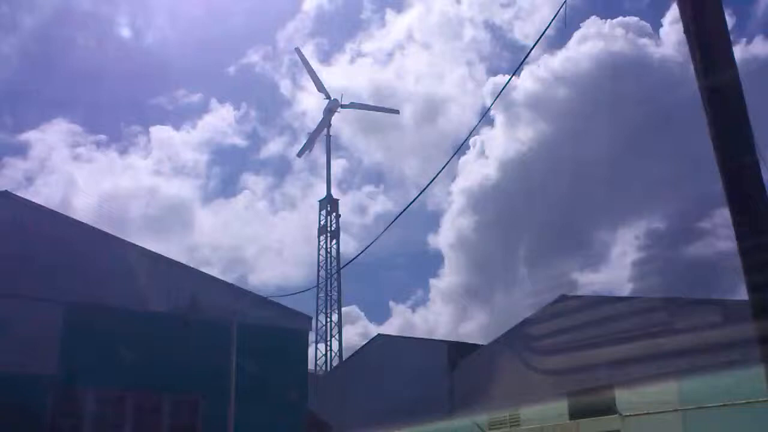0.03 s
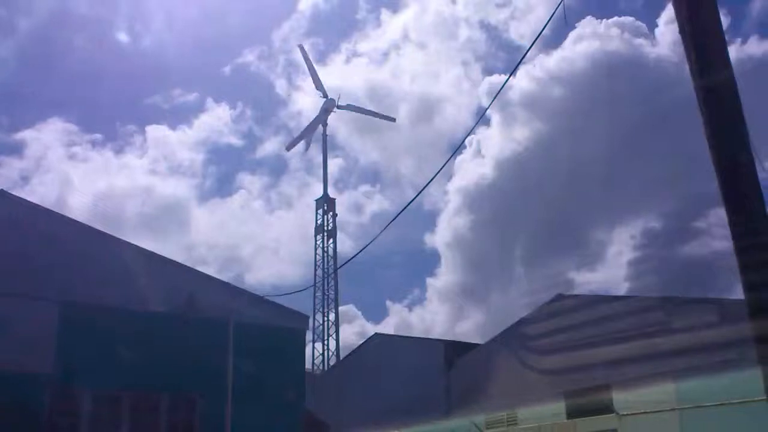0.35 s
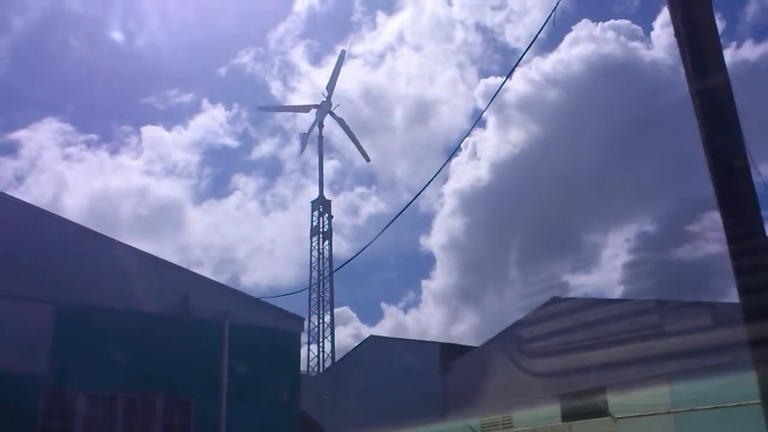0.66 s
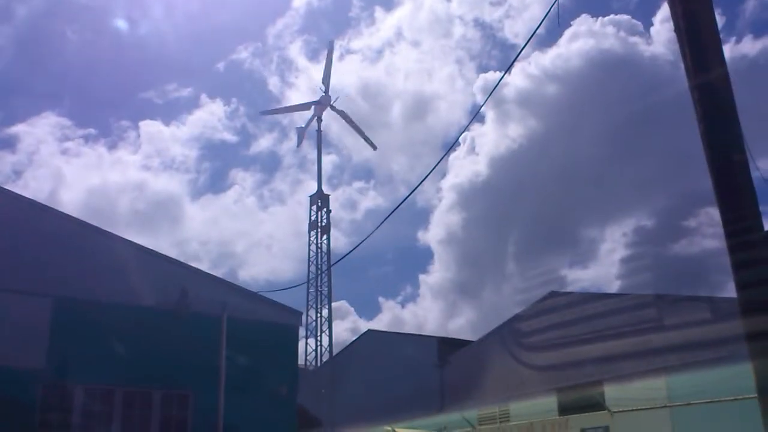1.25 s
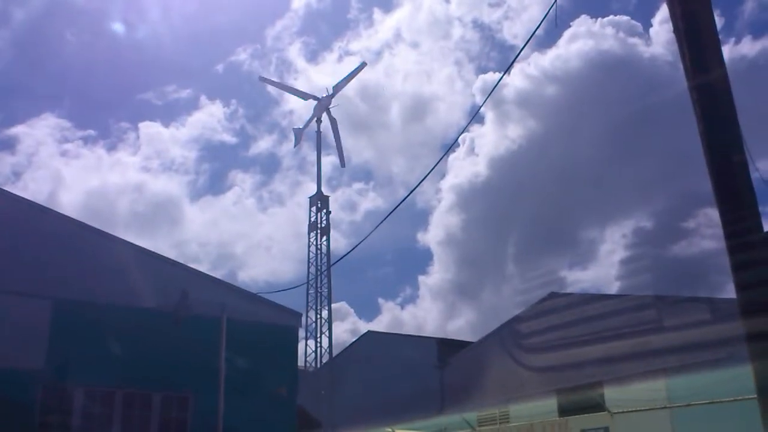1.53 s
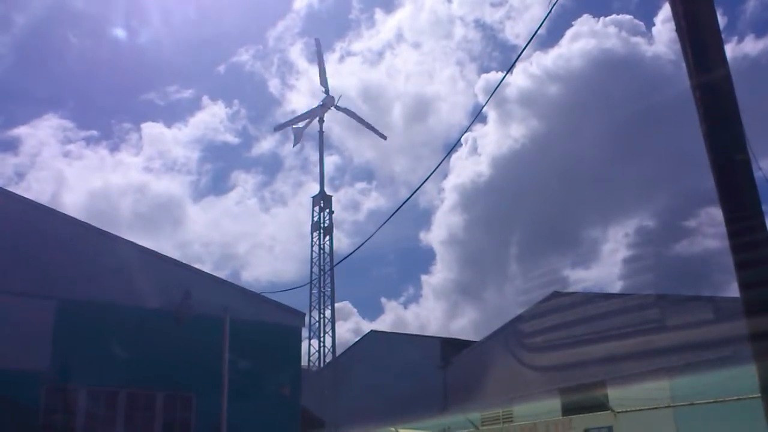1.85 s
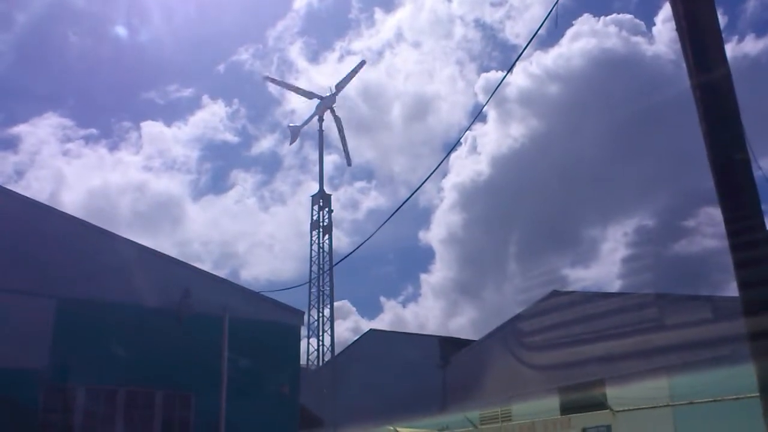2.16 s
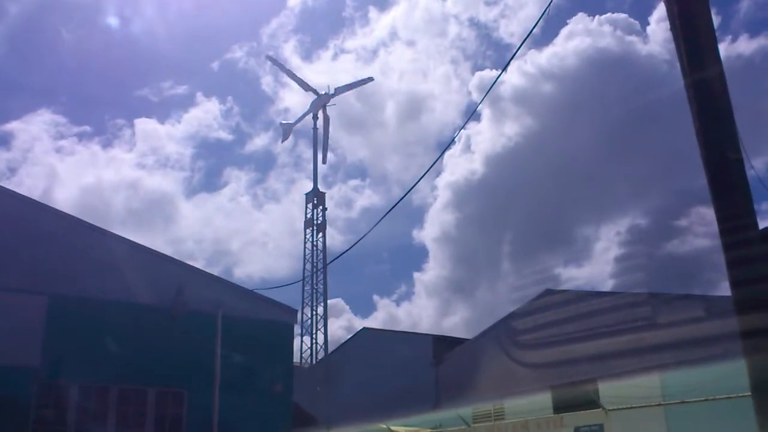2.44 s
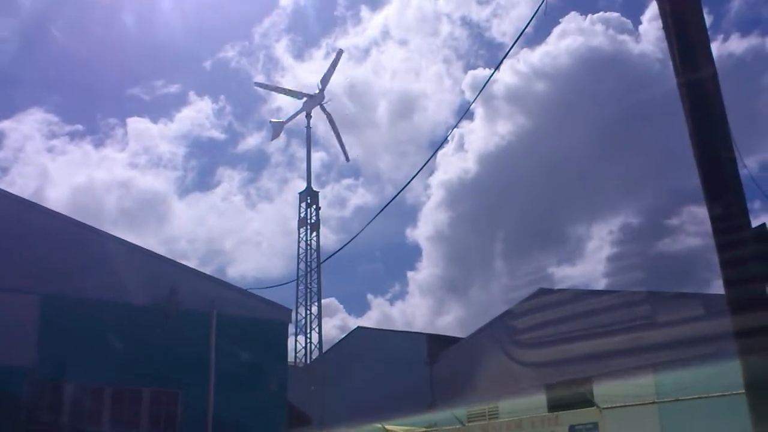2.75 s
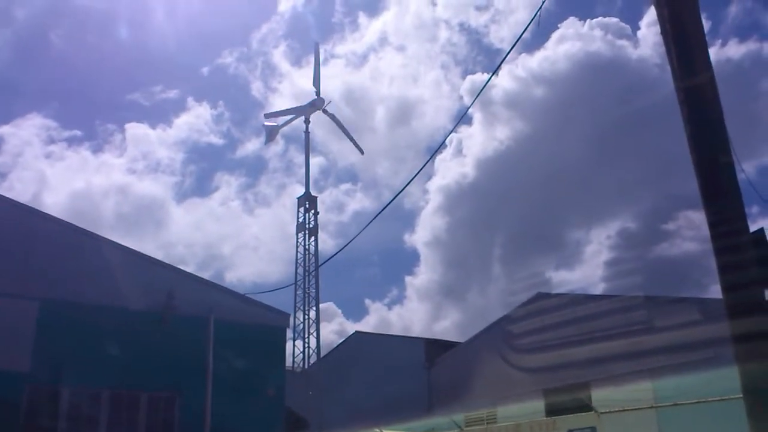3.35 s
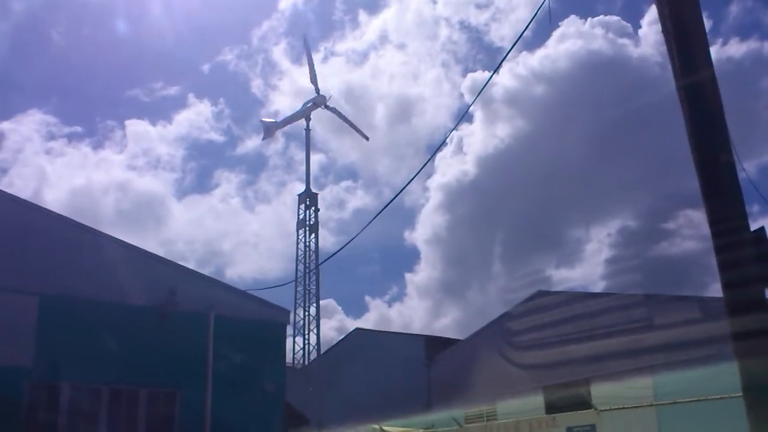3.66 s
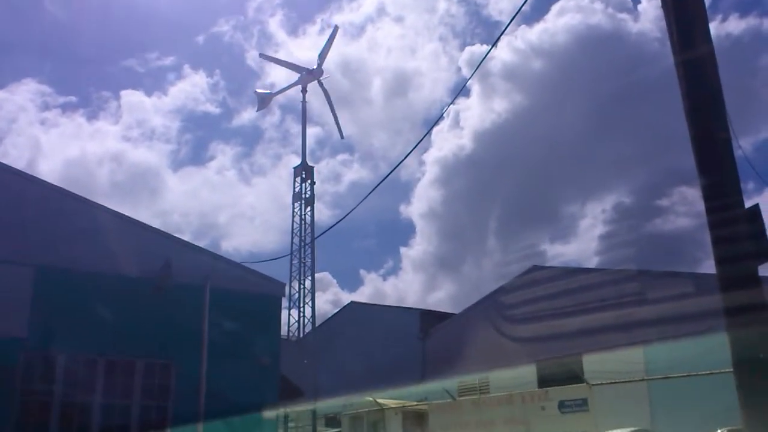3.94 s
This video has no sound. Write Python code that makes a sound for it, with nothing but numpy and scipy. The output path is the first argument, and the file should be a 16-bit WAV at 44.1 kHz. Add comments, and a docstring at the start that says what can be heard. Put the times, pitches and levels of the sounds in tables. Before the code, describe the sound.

Deep engine idle and low wind outdoors, with a small vehicle passing on hissing tyres.

```python
"""A deep idling throb, heard from a standing vehicle under a rumble of wind and far traffic.
The throb is a tone at the engine's firing rate with fluttering overtones; the wind gusts and booms once.
A small vehicle passes, closest at about 3.2 s: its exhaust drone, four harmonics of its firing rate,
swells and drops in pitch. Its tyres roar and hiss, bands of noise and ringing resonances that
rise and fall as it goes by, and it gives a few faint squeaks."""
import sys
import numpy as np
from scipy import signal
from scipy.io import wavfile
from scipy.ndimage import uniform_filter1d

SR = 44100
rng = np.random.default_rng(int(sys.argv[2]) if len(sys.argv) > 2 else 0)


def generate_wav(signal):
    """Clip the signal to [-1, 1] and save it as 16-bit WAV at the path in sys.argv[1]."""
    frames = np.transpose(np.atleast_2d(signal))
    scaled = np.clip(frames, -1, 1) * 32767
    pcm = np.round(scaled).astype(np.int16)
    wavfile.write(sys.argv[1], SR, pcm)


N = 176400
T = np.arange(N) / SR

IDLE_HZ = 25.88  # firing rate of the standing engine
# firing rate of the passing engine, as heard: time_s, rate_hz
PASSING_FIRING = [(0, 90), (1.9, 90.5), (2.33, 92), (2.6, 90), (2.8, 83), (3.1, 81.3), (3.35, 78.7),
                  (4, 79)]


def from_db(db):
    """Decibels to gain."""
    return 10 ** (np.asarray(db) / 20)


def rms_one(x):
    """Scale to unit rms."""
    return x / np.sqrt(np.mean(x ** 2) + 1e-20)


def curves(rows):
    """Breakpoints (time_s, values...) joined by straight lines, one curve per value column."""
    times, *columns = np.transpose(rows)
    return [np.interp(T, times, column) for column in columns]


def drift(rate_hz):
    """Smooth random modulation with a spread of 1."""
    step, settle = 20, 4000  # samples per control point; points the filter takes to settle
    pole = np.exp(-2 * np.pi * rate_hz * step / SR)
    white = rng.standard_normal(N // step + settle + 2)
    slow = signal.lfilter([1], [1, -2 * pole, pole * pole], white)[settle:]
    return np.interp(np.arange(N) / step, np.arange(len(slow)), rms_one(slow))


def tone(hz):
    """A sine of unit rms on a steady or moving pitch."""
    cycles = np.cumsum(np.broadcast_to(hz, N)) / SR
    return np.sqrt(2) * np.sin(2 * np.pi * (cycles + rng.random()))


def narrow_noise(hz, width_hz):
    """Noise of unit rms in one resonance, whose centre may move."""
    phase = 2 * np.pi * np.cumsum(np.broadcast_to(hz, N)) / SR
    rate_hz = width_hz * np.pi / 4
    return rms_one(drift(rate_hz) * np.cos(phase) + drift(rate_hz) * np.sin(phase))


def banded_noise(spectrum, flicker_db):
    """Quarter-octave bands of noise, each with its own level and flicker; unit rms overall."""
    edges_hz = 22 * 2 ** np.arange(0, 9.3, .25)
    hz, db = np.transpose(spectrum)
    shared_flicker = drift(8)
    white = rng.standard_normal((2, N + SR // 2))
    out = 0
    for k, (low, high) in enumerate(zip(edges_hz, edges_hz[1:])):
        bandpass = signal.butter(2, [low, high], "band", fs=SR, output="sos")
        band = signal.sosfilt(bandpass, white[k % 2])[-N:]
        level_db = np.interp(np.log(low * high) / 2, np.log(hz), db)
        out += band * from_db(level_db + flicker_db * (.5 * shared_flicker + drift(14)))
    return rms_one(out)


def pass_by(peak_s, rise_s, fall_s, steepness):
    """Gain of a source going by on a straight line: 1 at its closest, less with distance."""
    along = (T - peak_s) / np.where(T < peak_s, rise_s, fall_s)
    return 1 / np.hypot(1, along) ** steepness


def wind_and_traffic():
    """A bed of dark rumble that swells with the far traffic."""
    # tone colour of the rumble: frequency_hz, relative_db
    spectrum = [(25, -6), (48, -5), (85, -.3), (115, -3.7), (170, -4.2), (230, -8.8), (300, -9.6),
                (420, -12), (560, -16), (700, -23.3), (950, -17.7), (1250, -20.4), (1800, -24.8),
                (2500, -32.5), (4000, -36), (6500, -40.5), (8000, -51), (9000, -55), (11000, -60)]
    # swell of the traffic: time_s, gain_db
    swell = [(0.1, 2.1), (0.9, -.5), (1.6, -.7), (2.2, 3.2), (2.5, 1.1), (4, -.7)]
    swell_db, = curves(swell)
    return from_db(-35.1 + swell_db) * banded_noise(spectrum, flicker_db=.9)


def wind_gusts():
    """Deep buffeting that comes and goes."""
    # strength of the gusts: time_s, level_db
    strength = [(0.1, -39), (.65, -44), (1.35, -34), (1.8, -36), (2.4, -38), (2.7, -31), (2.95, -39),
                (3.3, -38), (3.5, -46), (4, -48)]
    level_db, = curves(strength)
    return from_db(level_db) * narrow_noise(49, width_hz=16)


def wind_boom():
    """One short, low boom of buffeting air."""
    start_s, end_s, attack_s, release_s = .82, 1.2, .07, .22
    ramps = np.minimum((T - start_s) / attack_s, (end_s - T) / release_s)
    return from_db(-29.7) * np.sqrt(np.clip(ramps, 0, 1)) * tone(hz=53.5)


def engine_whirs():
    """Narrow bands of steady noise from the idling engine."""
    # whirs: pitch_hz, width_hz, level_db
    whirs = [(896, 55, -53.7), (1720, 40, -60), (6290, 80, -71.5), (6780, 120, -72), (7400, 140, -76)]
    return sum(from_db(db) * narrow_noise(hz, width) for hz, width, db in whirs)


def engine_whine():
    """A thin, high engine whine that lifts for a moment."""
    # swell of the whine: time_s, level_db
    swell = [(0, -63.5), (1.4, -62), (1.85, -58.5), (2.25, -57.5), (2.6, -63), (4, -68)]
    level_db, = curves(swell)
    return from_db(level_db + .7 * drift(6)) * narrow_noise(4200, width_hz=140)


def idle_clatter(noise):
    """The given noise, its upper part pulsing faintly with each firing of the idling engine."""
    depth, above_hz = .055, 500
    upper = signal.sosfilt(signal.butter(1, above_hz, "high", fs=SR, output="sos"), noise)
    pulse = tone(IDLE_HZ) + tone(2 * IDLE_HZ)
    return noise + depth * pulse * upper


def idle_throb():
    """The standing engine's firings make a deep throb, with fluttering overtones and hums above it."""
    # overtones of the idle: multiple_of_firing_rate, level_db
    orders = [(2, -42), (3, -50), (3.5, -46.5), (5, -46.5)]
    # hums of the standing vehicle: pitch_hz, level_db
    hums = [(41, -43), (133.5, -45.5), (180, -48), (205, -45)]
    flutter_db = 2
    firing_hz = IDLE_HZ * (1 + .002 * drift(1))
    overtones = [(multiple * firing_hz, db) for multiple, db in orders]
    partials = 0
    for hz, db in overtones + list(hums):
        gain = from_db(db + flutter_db * drift(3))
        partials += gain * tone(hz * (1 + .005 * drift(4)))
    return from_db(-28.3) * tone(firing_hz) + partials


def squeaks():
    """Brief, rough squeaks from the passing vehicle; most glide a little downward."""
    # squeaks: start_s, length_s, pitch_hz, level_db, sag_per_s (share of the pitch)
    events = [(2.20, .13, 895, -41, .2), (2.78, .13, 3560, -47, .2), (2.80, .10, 4320, -53, .2),
              (2.945, .06, 1205, -32.5, .8), (2.97, .16, 865, -42, .1), (3.00, .11, 1550, -42.5, 0),
              (3.005, .09, 555, -40, -.6), (3.09, .08, 1285, -41, -.4), (3.16, .06, 1272, -36.5, .2),
              (3.19, .05, 1670, -41, .3), (3.24, .105, 1182, -31.3, .1), (3.28, .09, 850, -40.5, 1.1),
              (3.328, .04, 865, -38, 0), (3.355, .06, 630, -40, .1)]
    jitter, roughness = .012, .3
    out = 0
    for start_s, length_s, hz, db, sag in events:
        age = np.clip(T - start_s, 0, length_s)
        pitch_hz = hz * (1 - sag * (age - length_s / 2) + jitter * drift(140))
        envelope = np.sin(np.pi * age / length_s) ** 2
        out += from_db(db) * envelope * (1 + roughness * drift(120)) * tone(pitch_hz)
    return out


def tyre_singing():
    """Two high resonances sing in the tyre noise and sink in pitch as the vehicle goes by."""
    # resonances at their loudest moment: pitch_hz, width_hz, level_db
    resonances = [(3410, 260, -44), (4260, 220, -55)]
    peak_s, doppler_share = 3.26, .27  # they follow this share of the engine's pitch drop
    firing_hz, = curves(PASSING_FIRING)
    doppler = (firing_hz / np.interp(peak_s, T, firing_hz)) ** doppler_share
    singing = sum(from_db(db) * narrow_noise(hz * doppler, width) for hz, width, db in resonances)
    return pass_by(peak_s, rise_s=.5, fall_s=.46, steepness=2.4) * singing


def tyre_hiss():
    """A first rush as the tyres come near, then their full hiss, with a brighter sizzle trailing."""
    # tone colour of the hiss: frequency_hz, relative_db
    hiss_spectrum = [(1000, -15), (2000, -4), (2900, -1.5), (3800, -1), (4300, -1), (5200, -5),
                     (6300, -10.5), (7500, -21), (9000, -27), (11000, -42)]
    # tone colour of the sizzle: frequency_hz, relative_db
    sizzle_spectrum = [(2500, -14), (4500, -4), (5800, 0), (6500, -4), (7500, -14), (9000, -21),
                       (11000, -40)]
    rush = from_db(-56) * pass_by(peak_s=2.85, rise_s=.05, fall_s=.08, steepness=2.2)
    swell = from_db(-42.8) * pass_by(peak_s=3.23, rise_s=.33, fall_s=.35, steepness=1.42)
    trail = from_db(-49.3) * pass_by(peak_s=3.47, rise_s=.3, fall_s=.18, steepness=1.7)
    hiss = banded_noise(hiss_spectrum, flicker_db=.6)
    sizzle = banded_noise(sizzle_spectrum, flicker_db=.6)
    return (rush + swell) * hiss + trail * sizzle


def tyre_roar():
    """The broad roar of rolling tyres, with resonances that flare and waver as they pass."""
    # tone colour of the roar: frequency_hz, relative_db
    spectrum = [(60, 0), (140, 7.5), (220, 4), (300, -.5), (400, 3.2), (600, -3.5), (700, -5.5),
                (850, -3.5), (1000, -5), (1200, -3), (1400, -5.5), (1650, -4.5), (2300, -13), (3000, -18),
                (6000, -36)]
    # resonances at their loudest moment: pitch_hz, width_hz, level_db
    resonances = [(590, 50, -46.5), (850, 70, -46), (1230, 90, -45), (1555, 70, -45.5), (1720, 90, -46.5),
                  (2040, 130, -49)]
    flare_db, waver = 2.5, .015
    ringing = 0
    for hz, width, db in resonances:
        gain = from_db(db + flare_db * drift(9))
        ringing += gain * narrow_noise(hz * (1 + waver * drift(6)), width)
    roar_swell = from_db(-33.3) * pass_by(peak_s=3.21, rise_s=.32, fall_s=.27, steepness=1.2)
    ring_swell = pass_by(peak_s=3.2, rise_s=.28, fall_s=.28, steepness=2.6)
    return roar_swell * banded_noise(spectrum, flicker_db=1.5) + ring_swell * ringing


def exhaust_drone():
    """The passing engine's exhaust: four slightly rough harmonics of its firing rate."""
    # swell of the two lowest harmonics: time_s, first_db, second_db
    swell = [(0, -52, -58), (1.5, -46, -50), (1.7, -46, -40.5), (1.9, -47, -41), (2.05, -46, -36),
             (2.3, -42, -26.2), (2.4, -33.5, -29.7), (2.52, -36, -32.5), (2.72, -37, -41),
             (3.0, -41, -32.5), (3.17, -30.5, -33.5), (3.3, -43, -34), (3.4, -42, -37), (3.49, -41, -28.8),
             (3.68, -42, -46), (4, -41, -54)]
    rough_db = .85
    firing_hz, = curves(PASSING_FIRING)
    first_db, second_db = curves(swell)
    levels_db = [first_db, second_db, second_db - 20, second_db - 21]
    return sum(from_db(db + rough_db * drift(15)) * tone(harmonic * firing_hz)
               for harmonic, db in enumerate(levels_db, start=1))


def limiter(x):
    """Turns the gain down quickly on peaks above the ceiling, and lets it recover slowly."""
    ceiling_db, release_db_per_s, attack_s = -18.2, 60, .004
    over_db = np.maximum(20 * np.log10(np.abs(x[0]) + 1e-9) - ceiling_db, 0)
    recovery_db = release_db_per_s * T
    held_db = np.maximum.accumulate(over_db + recovery_db) - recovery_db
    return x * from_db(-uniform_filter1d(held_db, int(attack_s * SR)))


def scene():
    """The idle, the street and the passing vehicle, mixed in mono."""
    idle = idle_throb()
    bed = idle_clatter(engine_whirs() + wind_and_traffic()) + engine_whine()
    buffeting = wind_gusts() + wind_boom()
    vehicle = exhaust_drone() + tyre_roar() + tyre_hiss() + tyre_singing() + squeaks()
    return (idle + bed + buffeting + vehicle)[None]


def record(dry):
    """Silence until the sound cuts in; peaks are held down and the top treble is cut."""
    start_s, fade_s, cutoff_hz = .105, .004, 11200
    fade_in = np.clip((T - start_s) / fade_s, 0, 1)
    lowpass = signal.cheby2(12, 70, cutoff_hz, fs=SR, output="sos")
    return signal.sosfilt(lowpass, limiter(dry * fade_in))


dry = scene()
out = record(dry)
generate_wav(out)
```